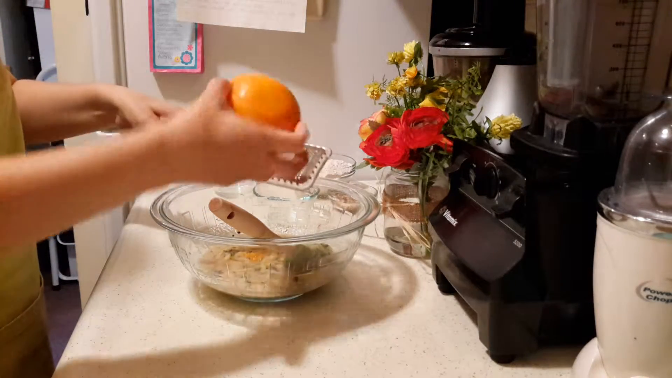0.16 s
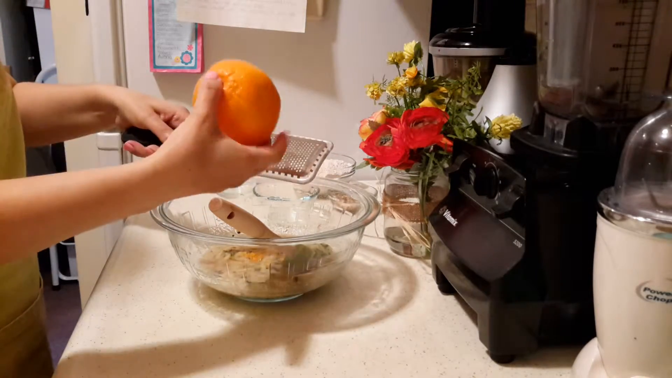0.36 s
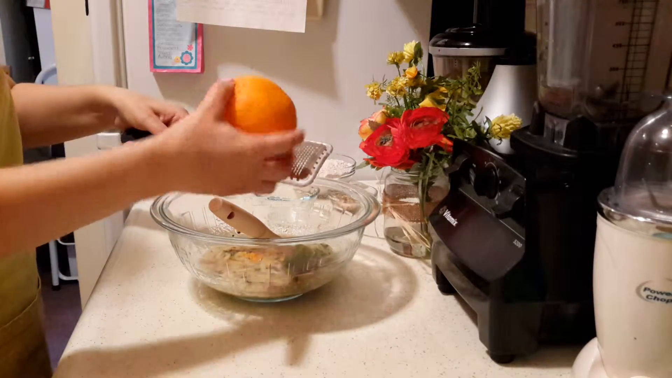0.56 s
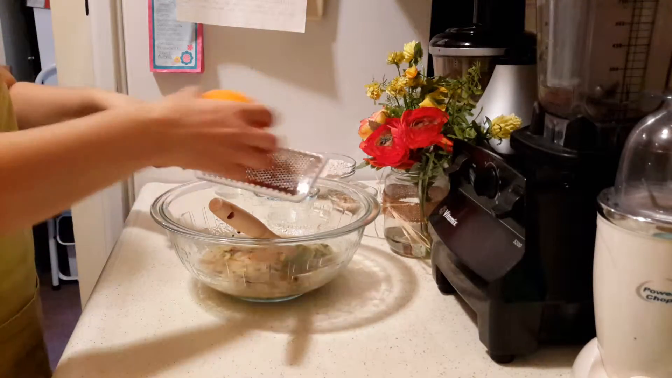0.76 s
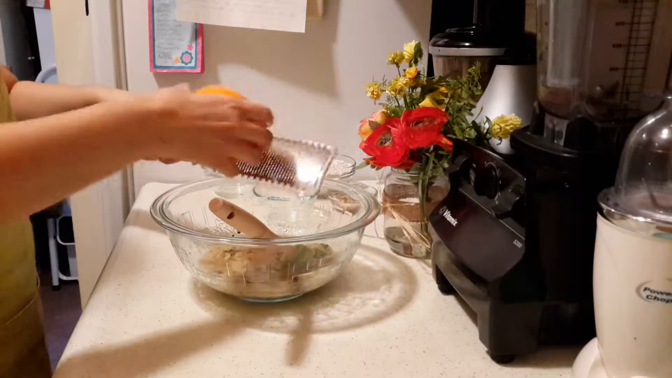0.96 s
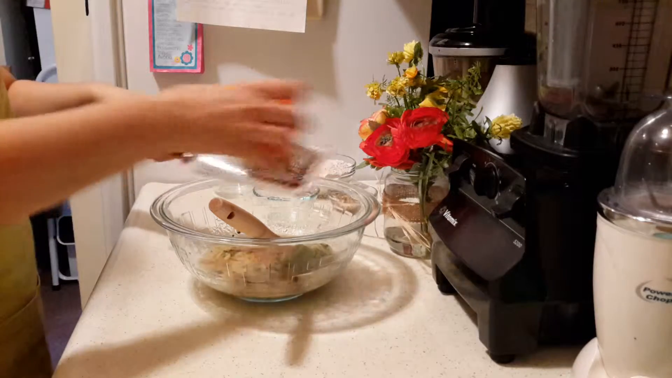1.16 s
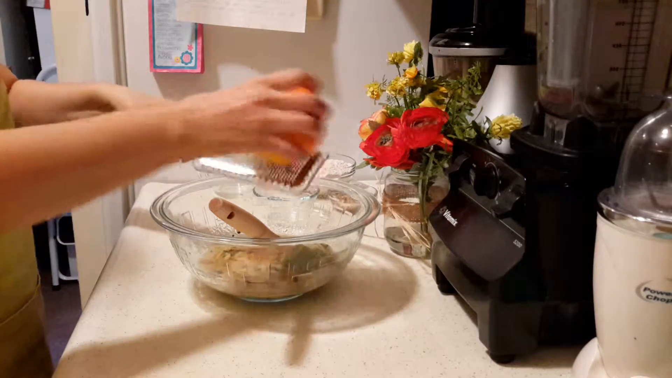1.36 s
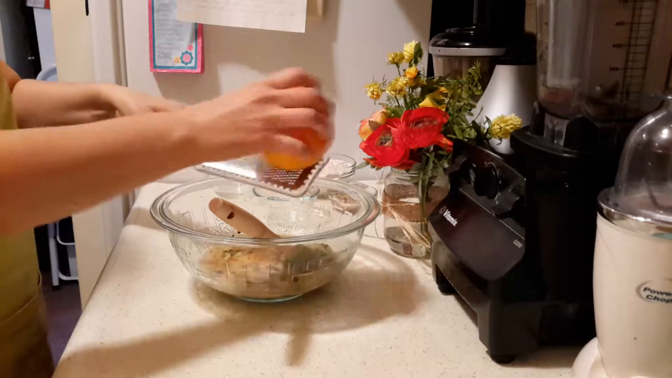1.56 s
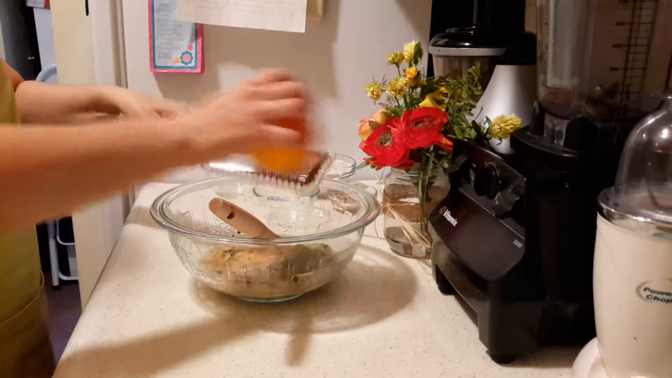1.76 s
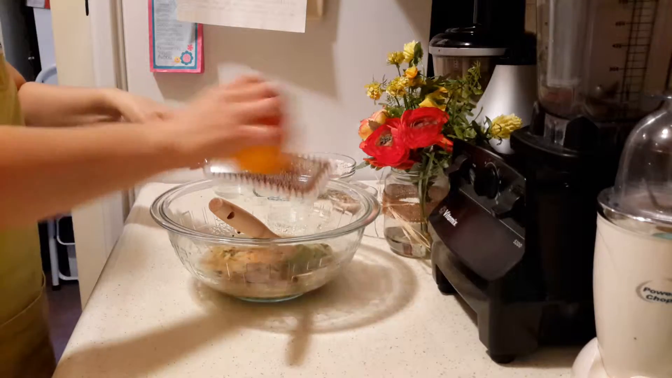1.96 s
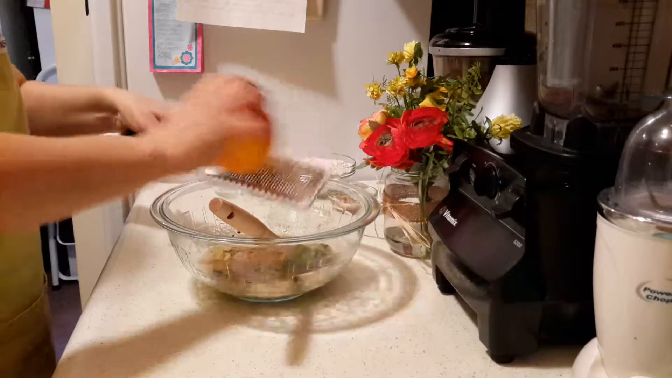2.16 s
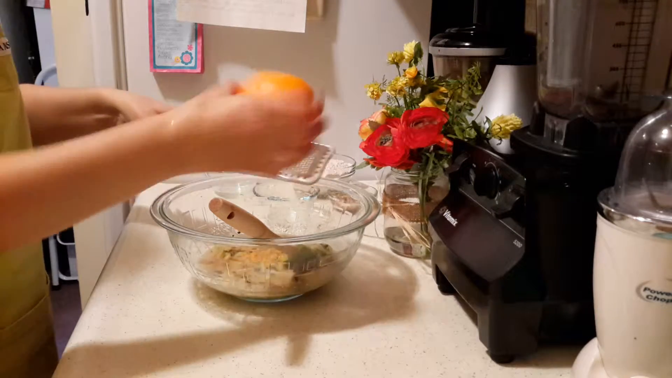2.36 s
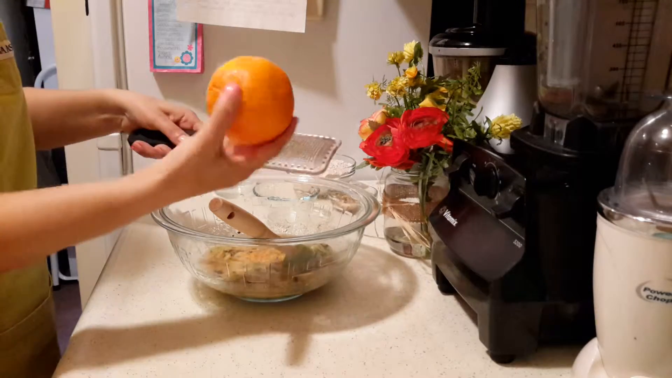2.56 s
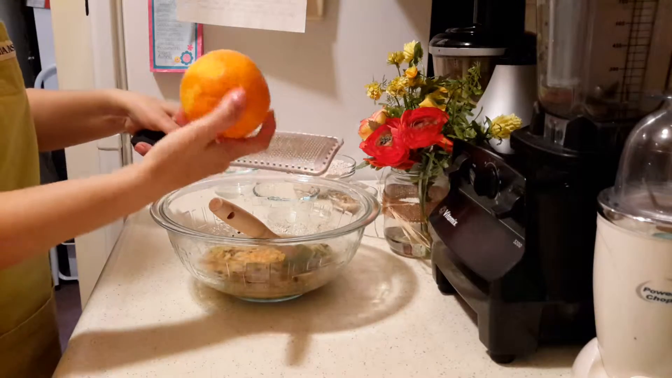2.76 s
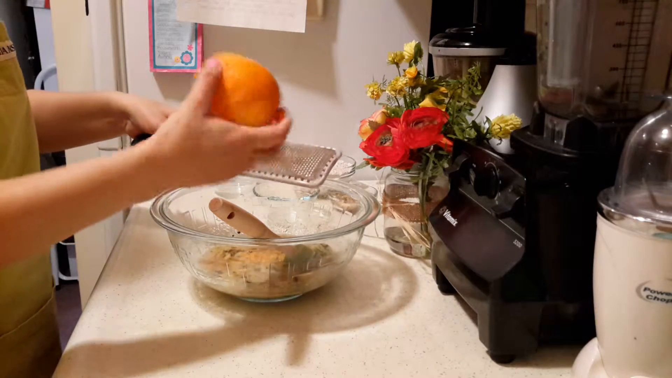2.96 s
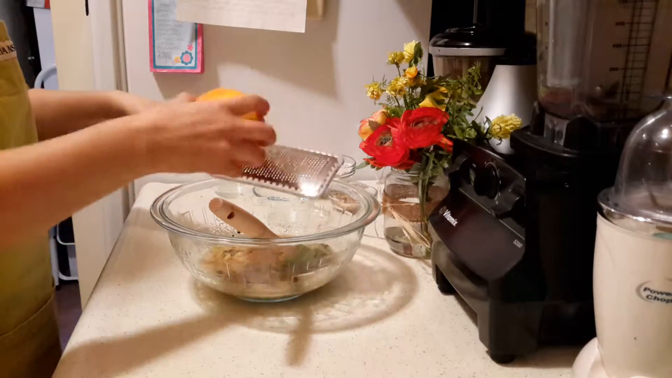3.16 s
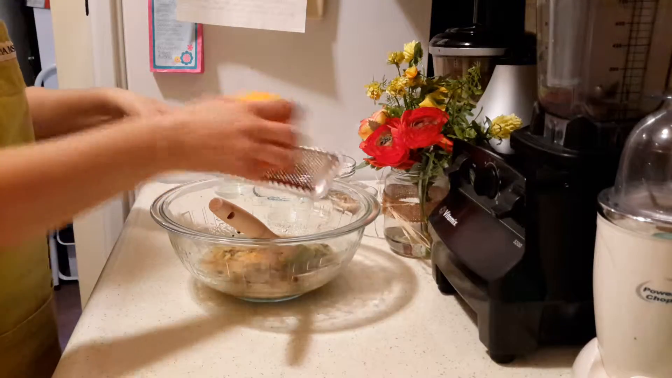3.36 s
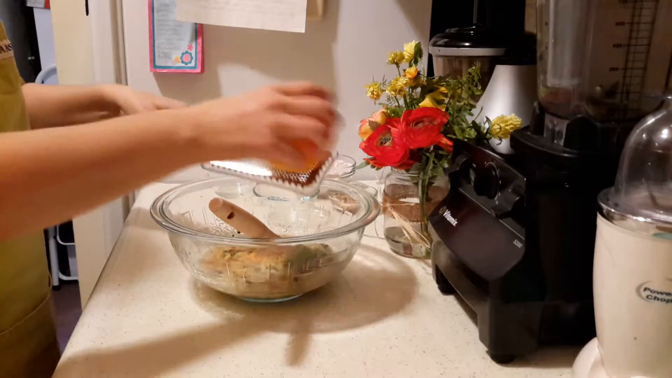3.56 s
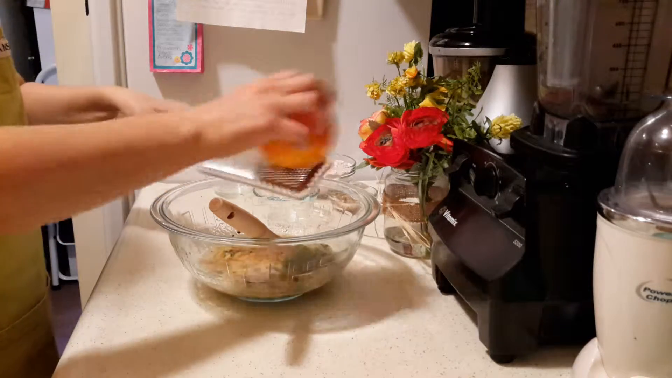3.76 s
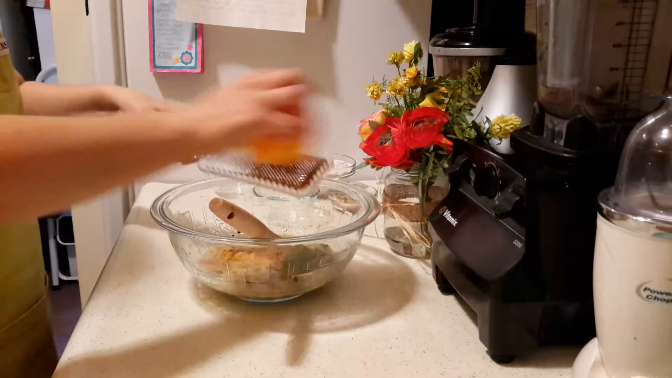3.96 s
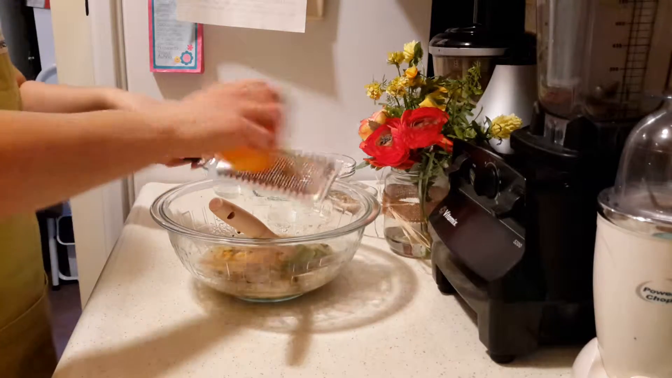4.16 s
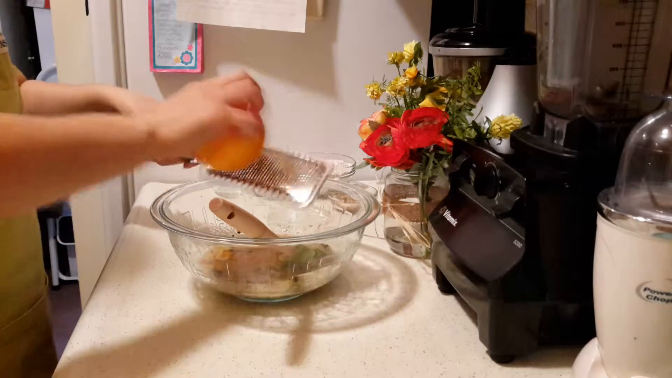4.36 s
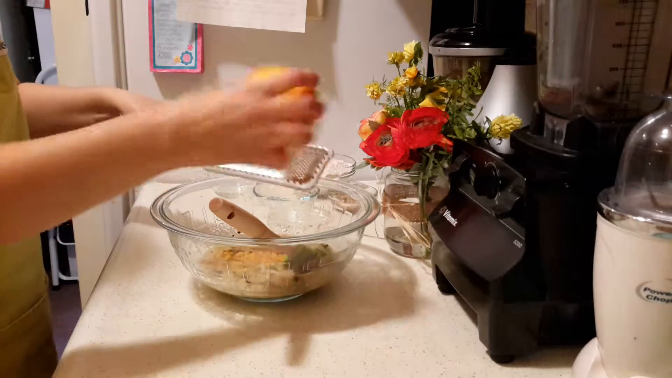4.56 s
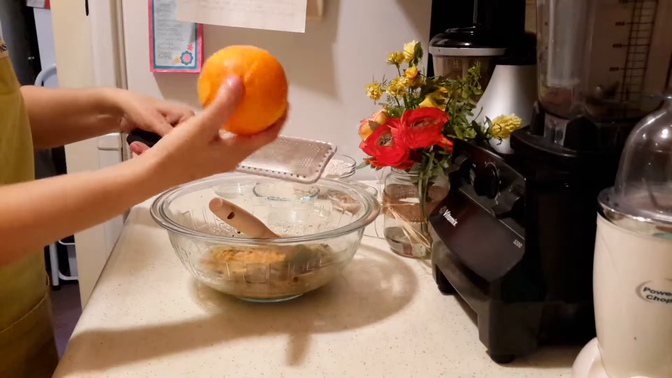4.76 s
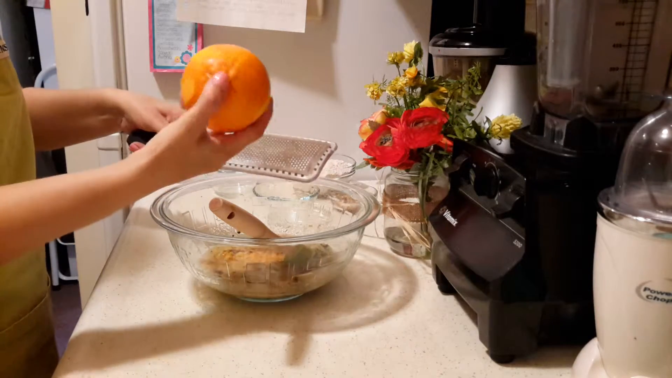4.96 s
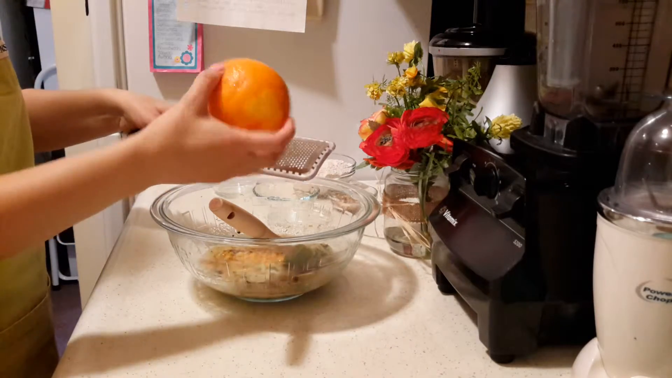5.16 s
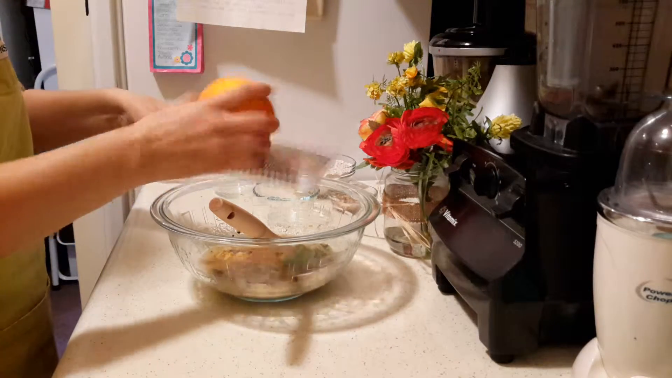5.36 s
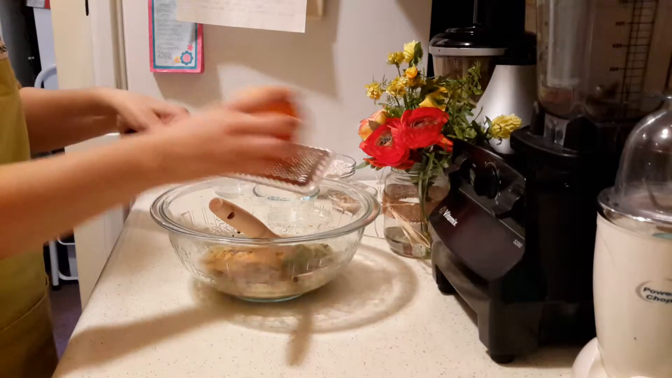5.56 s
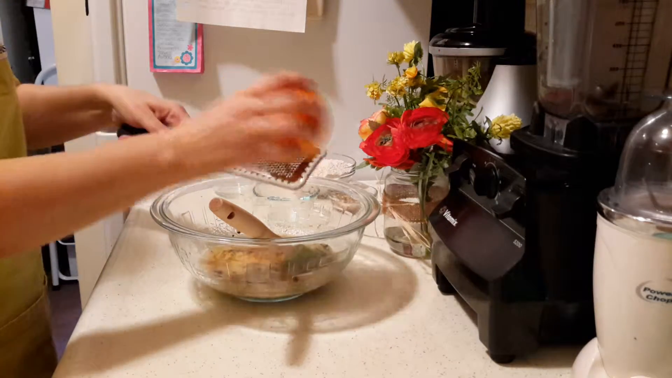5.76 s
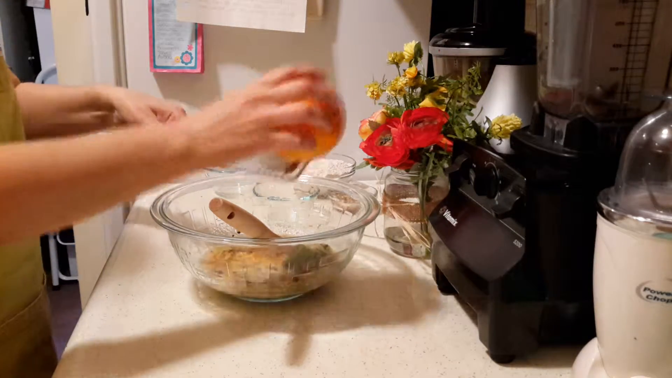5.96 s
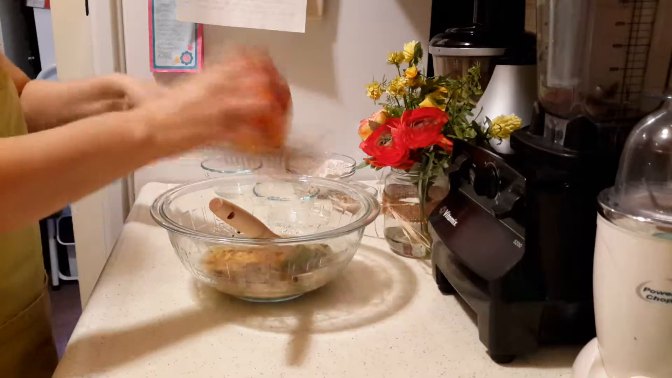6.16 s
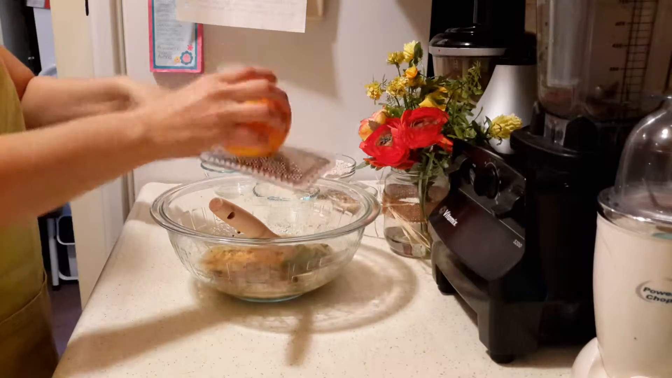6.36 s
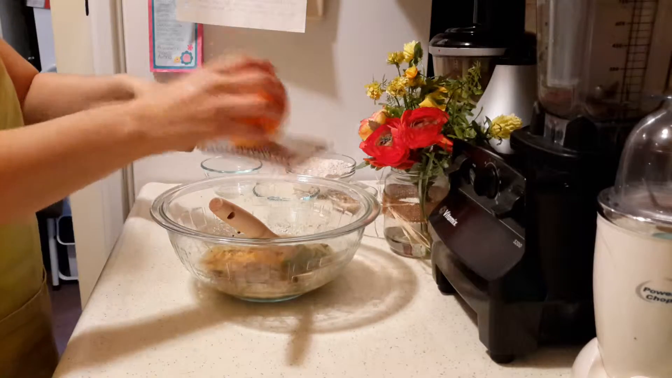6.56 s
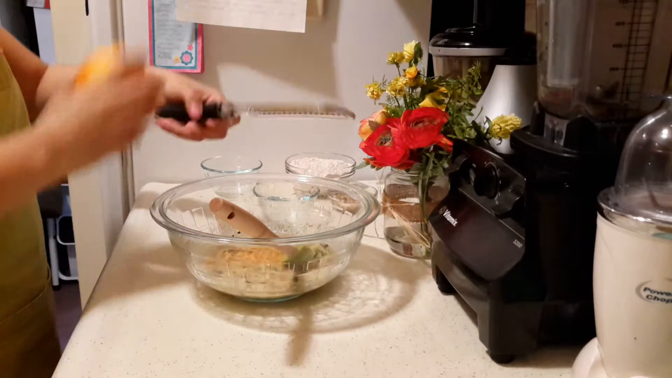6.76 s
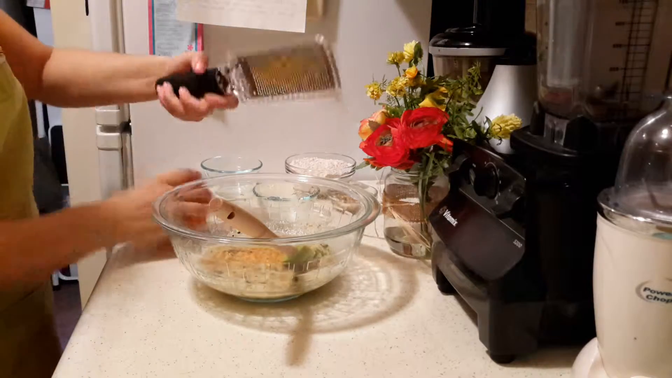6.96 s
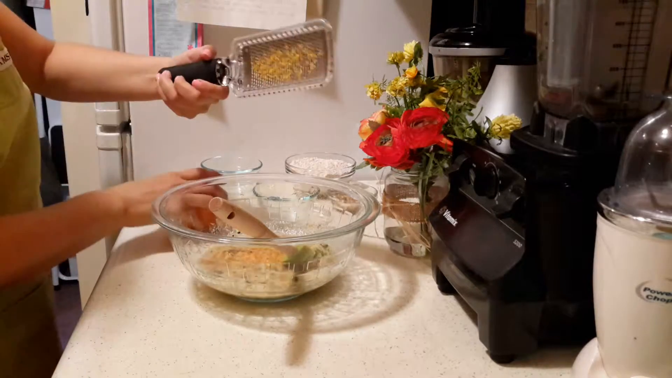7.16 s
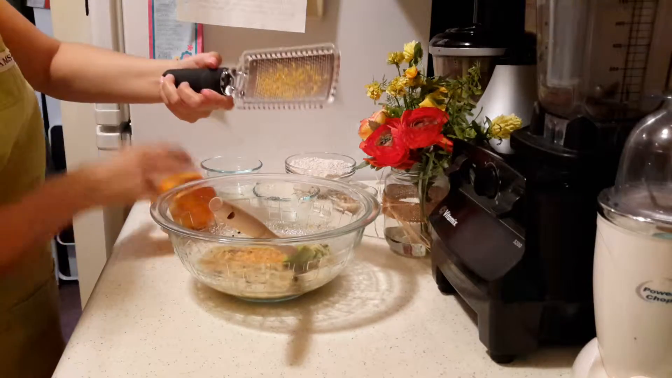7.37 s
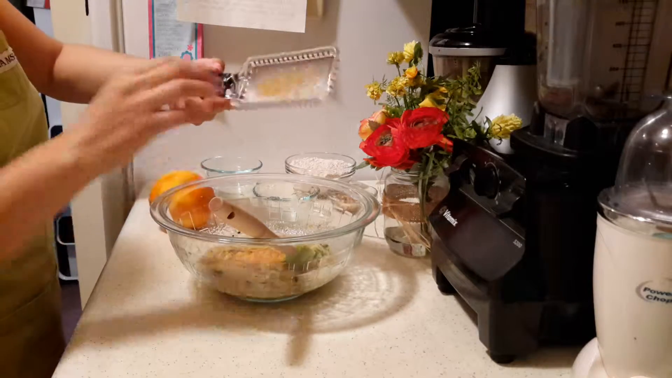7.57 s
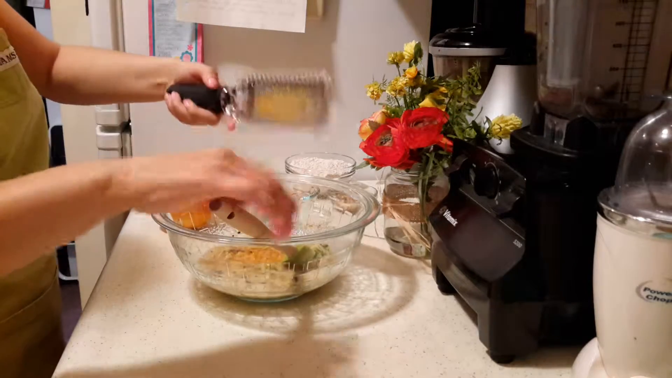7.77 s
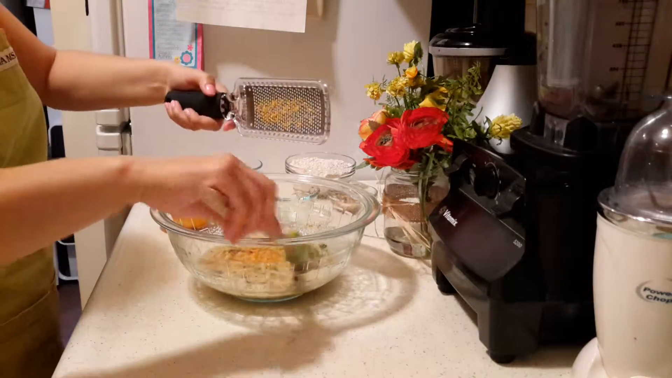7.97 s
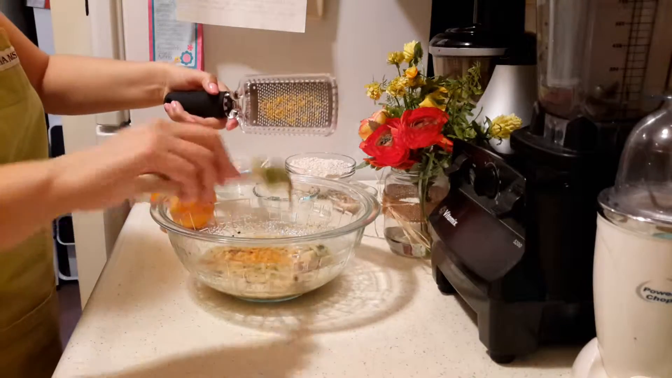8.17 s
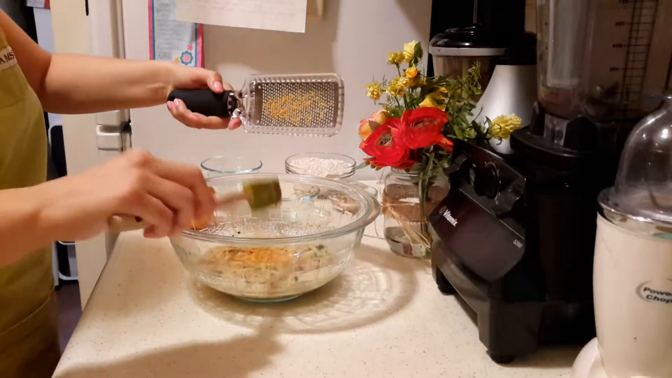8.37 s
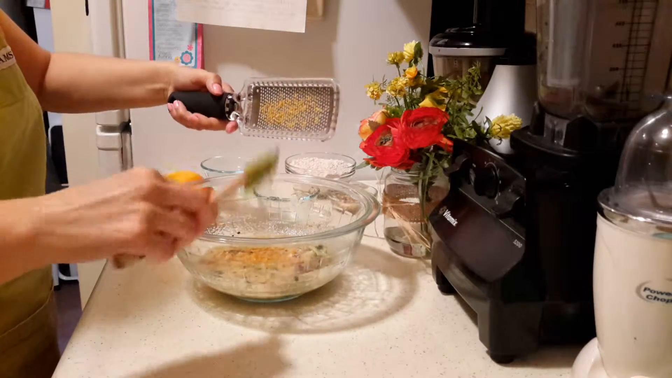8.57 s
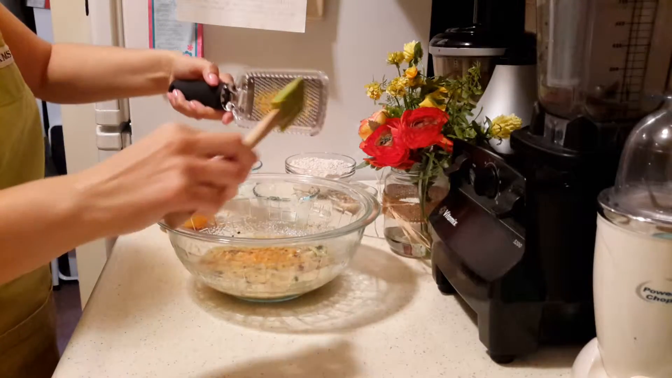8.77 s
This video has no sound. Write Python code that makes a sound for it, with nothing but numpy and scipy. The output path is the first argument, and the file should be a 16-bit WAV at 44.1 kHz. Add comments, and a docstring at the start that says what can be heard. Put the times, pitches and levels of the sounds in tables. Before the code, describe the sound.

Orange peel is rasped back and forth on a metal grater in quick bursts, then tapped; a glass bowl clanks over a low appliance hum.

```python
"""A small kitchen with a small, hissing microphone: an appliance hums throughout, built of coloured noise and tones.
An orange is rasped to and fro on a steel hand grater in several series: showers of snaps, coloured by teeth and plate.
It is then tapped on the grater to shake the zest off (chatter and ringing modes) and set down (low pushes).
Last, a glass bowl is knocked and rocks on the counter: beating pairs of tones, thuds and cracks.
The recorder's noise suppressor lets hum and hiss swell while loud sound, such as the rasping, lasts."""
import sys
import numpy as np
from scipy import signal
from scipy.fft import rfft, irfft
from scipy.io import wavfile
from scipy.ndimage import uniform_filter1d, minimum_filter1d, map_coordinates

SR = 44100
rng = np.random.default_rng(int(sys.argv[2]) if len(sys.argv) > 2 else 0)


def voltage_ratio(level):
    """Linear amplitude factor for a level in decibels (scalar or array-like)."""
    return 10 ** (np.asarray(level, float) / 20)


def transcribe(signal):
    """Save signal, clipped to [-1, 1], as a 16-bit WAV file at the path in sys.argv[1]."""
    frames = np.atleast_2d(signal).T
    limited = np.clip(frames, -1, 1)
    pcm = np.round(limited * 32767).astype(np.int16)
    wavfile.write(sys.argv[1], SR, pcm)


N = 389403
T = np.arange(N) / SR


def unit(x):
    """Scaled to rms 1."""
    return x / np.sqrt(np.mean(x ** 2) + 1e-20)


def along(points, hz):
    """(Hz, value) points read on a log frequency axis."""
    f, v = np.transpose(points)
    return np.interp(np.log(hz + 1), np.log(f + 1), v)


def wobble(rate):
    """A smooth random curve with rate knots a second."""
    knots = rng.standard_normal(int(N * rate / SR) + 4)
    return map_coordinates(knots, [T * rate])


def coloured(x, spectrum, rings=()):
    """x through a minimum-phase filter of energy 1, shaped by a spectrum and broad resonances."""
    hz = np.fft.rfftfreq(8192, 1 / SR)
    db = along(spectrum, hz)
    for centre, width, gain_db in rings:
        db = db + gain_db / (1 + (2 * (hz - centre) / width) ** 2)
    # Folding the cepstrum onto positive times makes the filter causal.
    cepstrum = irfft(np.log(voltage_ratio(db) + 1e-6))
    cepstrum[1:4096] *= 2
    cepstrum[4097:] = 0
    pulse = irfft(np.exp(rfft(cepstrum)))
    return signal.fftconvolve(x, pulse / np.linalg.norm(pulse))[:len(x)]


def placed(s, x):
    """x on the time line, starting at s seconds."""
    out = np.zeros(N + len(x))
    out[round(s * SR):][:len(x)] = x
    return out[:N]


def tones(table, rate):
    """Steady lines that waver in level and slightly in phase."""
    out = np.zeros(N)
    for hz, db, waver_db in table:
        level = voltage_ratio(db + waver_db * wobble(rate))
        out += level * np.sin(2 * np.pi * hz * T + 0.55 * wobble(rate))
    return out


# How long the kitchen rings. Each row: frequency in Hz, t60 in s.
ROOM_DECAY = [(100, 0.38), (600, 0.42), (2000, 0.23), (8000, 0.19), (15000, 0.13)]


def room(x):
    """The walls answer with a noise tail in which each frequency dies at its own speed."""
    hz, t, z = signal.stft(rng.standard_normal(SR // 2), SR, nperseg=256)
    decay = voltage_ratio(-60 * t / along(ROOM_DECAY, hz)[:, None])
    tail = signal.istft(z * decay, SR, nperseg=256)[1]
    late = np.pad(x, (90, 0))  # 2 ms, a path 0.7 m longer than the direct one
    return signal.oaconvolve(late, tail / np.linalg.norm(tail))[:len(x)]


def blow(s, db, t60, room_db):
    """A contact that chatters briefly as decaying noise, and the walls' answer to a click with it."""
    t = T[:SR // 2]
    chatter = voltage_ratio(-60 * t / t60) * rng.standard_normal(len(t))
    click = 1. * (t == 0)
    return placed(s, voltage_ratio(db) * (chatter + voltage_ratio(room_db) * room(click)))


def push(s, db, hz, t60):
    """One contact that sets off a single decaying mode, with a soft onset."""
    t = T[:SR // 4]
    onset = 1 - np.exp(-t * hz)
    return placed(s, -voltage_ratio(db - 60 * t / t60) * onset * np.sin(2 * np.pi * hz * t))


# Colour of the microphone's hiss. Each row: frequency in Hz, relative level in dB.
HISS_COLOUR = [(900, -16), (1700, -14), (2400, -11), (4580, -13), (4890, -10.5), (5870, -11), (6210, -6),
               (7040, -6), (7820, 1), (10500, -12.5), (15700, -19.5)]
# Thin whines in it. Each row: frequency in Hz, level against the hiss in dB, waver in dB.
WHINES = [(5071, -19.5, 2.5), (6406, -12.5, 3.5), (7500, -21, 9), (12850, -30, 8)]


def microphone_hiss():
    """The small microphone's own noise, nearly steady, with thin wavering whines in it."""
    noise = voltage_ratio(0.35 * wobble(4.8)) * coloured(rng.standard_normal(N), HISS_COLOUR)
    return voltage_ratio(-59) * (noise + tones(WHINES, 25))


# Colour of the appliance's drone. Each row: frequency in Hz, relative level in dB.
DRONE_COLOUR = [(25, -34), (55, -33), (75, -35), (95, -24), (118, -21), (140, -18), (165, -5), (195, -13.5),
                (250, -17.5), (300, -14.5), (400, -13), (450, -18.5), (650, -19), (750, -24), (1250, -29.5),
                (1550, -30.5), (1750, -39.5), (2600, -71)]
# Its motor tones. Each row: frequency in Hz, level against the hum in dB, waver in dB.
MOTOR_TONES = [(55, -12, 1), (218.3, 0.5, 2), (406, -12, 0)]


def appliance():
    """The appliance's hum: low coloured noise and motor tones."""
    drone = voltage_ratio(-2.5 + 0.27 * wobble(2.37)) * coloured(rng.standard_normal(N), DRONE_COLOUR)
    return voltage_ratio(-49) * (drone + tones(MOTOR_TONES, 9))


# The orange lands on the teeth before a series of strokes. Each row: start in s, level in dB.
LANDINGS_AT = [(.832, -39), (3.28, -40.5), (5.5307, -42)]
# Small wet ticks of fingers on the peel. Each row: start in s, level in dB.
FINGER_TICKS = [(0.292, -48), (4.79, -46), (4.882, -47), (5.091, -47), (6.807, -48), (7.05, -69),
                (8.067, -48)]
# Faint scuffs of the hands. Each row: start in s, level in dB, pitch in Hz, spread in octaves,
# life (fall of 20 dB) in s.
HAND_SCUFFS = [(4.849, -52, 13100, .3, .02), (6.86, -58, 4470, 1.3, .13), (7.168, -50, 1300, .5, .02),
               (7.49, -56.5, 4500, 1.5, 0.14), (7.545, -52, 7350, .1, .05)]


def ticks():
    """Landings, ticks and scuffs: short puffs of noise in a band around each pitch."""
    rows = [(s, db, 6300, 0.85, 0.0084) for s, db in LANDINGS_AT]
    rows += [(s, db, 8800, 0.19, 0.0066) for s, db in FINGER_TICKS]
    rows += HAND_SCUFFS
    out = np.zeros(N)
    t = T[:SR // 4]
    for s, db, hz, octaves, life in rows:
        envelope = voltage_ratio(db - 20 * t / life) * (1 - np.exp(-8 * t / life))
        puff = envelope * rng.standard_normal(len(t))
        low, high = hz / 2 ** octaves, hz * 2 ** octaves
        band = [(low * 0.58, -30), (low, -5), (hz, 0), (high, -5), (high * 1.4, -30)]
        out += placed(s, coloured(puff, band))
    return out + voltage_ratio(-2.5) * room(out)


# The orange is set down on the counter and settles.
# Each row: start in s, level in dB, pitch at the onset in Hz.
SET_DOWN = [(7.172, -49, 95), (7.199, -40, 158)]


def thumps():
    """A soft, heavy contact: a low decaying push whose pitch falls for 60 ms, then steadies partway back."""
    t = T[:SR // 4]
    out = np.zeros(N)
    for s, db, hz in SET_DOWN:
        bend = 1 - 4.4 * np.minimum(t, 0.06)
        out += placed(s, voltage_ratio(db - 60 * t / 0.16) * np.sin(2 * np.pi * hz * t * bend))
    return out


# Modes of the bowl, in Hz; each has a close twin that beats against it.
BOWL_HZ = [577, 1114, 1470, 2721, 4248, 5941, 6998, 7777, 8301, 8958, 9695, 10765, 12140, 13870]
# For each mode. Each row: level in dB, t60 in s, twin above the mode in Hz, signed share of the twin.
BOWL_MODES = [(-42, .3, 2, -0.23), (-34, 0.17, 5.4, .3), (-24, 0.63, 7.7, -1.45), (-19.5, 0.39, 28.5, 0.34),
              (-14.5, 0.2, 6.2, -0.34), (-18, 0.18, 11, 0.071), (-39, .15, 15, .3), (-17, 0.11, 14, 0.18),
              (-23, 0.12, 12, 0.031), (-35, 0.21, 14, -0.26), (-32, 0.1, 20, .3), (-33, 0.099, 20, .3),
              (-46, .08, 20, .3), (-54, .09, 20, .3)]
# The blow, then the foot rocking on the counter. Each row: start in s, thud in dB, crack in dB.
BOWL_KNOCKS = [(8.6269, -15.5, -9), (8.6323, -5, -16), (8.654, -10, -33), (8.689, -26, -35)]
# Colours of thud and crack. Each row: frequency in Hz, relative level in dB per Hz.
THUD_COLOUR = [(50, -27), (90, -12), (130, -8), (165, -10), (220, -4), (340, -11), (600, -6.5), (1200, -12),
               (2500, -22), (6000, -56), (12000, -100)]
CRACK_COLOUR = [(600, -50), (2000, 4.5), (3500, 0.5), (5000, -5), (8000, 4), (10500, -13), (12000, -27),
                (15000, -50)]
# Rings of the counter under the bowl. Each row: centre in Hz, width in Hz, gain in dB.
COUNTER_RINGS = [(128, 15, 4), (288, 20, 7), (334, 25, 5), (385, 25, 6), (616, 37, 3.5), (937, 29, 4)]


def bowl():
    """The struck glass rings in beating pairs; its foot thuds and cracks on the counter."""
    t = T[:SR // 2]
    ring = np.zeros(len(t))
    for hz, (db, t60, split, twin) in zip(BOWL_HZ, BOWL_MODES):
        pair = np.sin(2 * np.pi * hz * t) + twin * np.sin(2 * np.pi * (hz + split) * t)
        ring += voltage_ratio(db - 60 * t / t60) * pair
    glass = placed(BOWL_KNOCKS[0][0], ring * (1 - np.exp(-t / 0.0007)))
    foot = sum(push(s, db + 0.3, hz=346, t60=0.026) for s, db, _ in BOWL_KNOCKS)
    thud = sum(blow(s, db - 8.5, t60=0.041, room_db=18) for s, db, _ in BOWL_KNOCKS)
    crack = sum(blow(s, db, t60=0.011, room_db=15) for s, _, db in BOWL_KNOCKS)
    return glass + foot + coloured(thud, THUD_COLOUR, COUNTER_RINGS) + coloured(crack, CRACK_COLOUR)


# The orange taps the grater. Each row: start in s, level in dB, low knock and plate ring
# against that level in dB, t60 of the rattle in s.
ORANGE_TAPS = [(6.2365, -49.5, -22, -1, 0.032), (6.331, -16, -26, -26.5, 0.087),
               (6.5052, -22, -18.5, -17, 0.024), (6.6713, -27, -17, -18, 0.03)]
# Colour of the rattling teeth. Each row: frequency in Hz, relative level in dB.
RATTLE_COLOUR = [(700, -41), (1200, -26), (2000, -14), (3000, -11.5), (5400, -10.5), (7500, -1.5),
                 (10500, -12.5), (15700, -34)]
# Narrow modes of the struck grater. Each row: frequency in Hz, relative level in dB, t60 in s.
STEEL_MODES = [(942, -5, .12), (1900, -12, .15), (2400, -6, .11), (2611, -5, .14), (3287, -3, .2),
               (3941, -7, .11), (4355, -7, .15), (4900, -5, .12), (5733, -4, .12)]


def taps():
    """Each tap rattles the teeth, rings the plate and gives a duller knock of the fruit."""
    fruit = [(80, -14), (130, 7), (300, -31), (600, -2), (1000, -1.5), (2000, -21), (8000, -60)]  # Hz, dB
    rattle, ring, knock, firm, modes = np.zeros((5, N))
    for s, db, low_db, plate_db, t60 in ORANGE_TAPS:
        rattle += blow(s, db - 8.5, t60, room_db=22)
        ring += blow(s, db + plate_db, t60=0.06, room_db=23)
        knock += blow(s, db + low_db + 3, t60=0.04, room_db=16.5)
        firm += push(s + 0.00089, db + low_db + 8.5, hz=765, t60=0.029)
        for hz, mode_db, mode_t60 in STEEL_MODES:
            # Each tap excites the modes a little differently.
            modes += push(s, db - 25 + mode_db + rng.normal(0, 3.4), hz, mode_t60)
    struck = coloured(rattle, RATTLE_COLOUR) + coloured(ring, PLATE_COLOUR, PLATE_RINGS)
    return firm + modes + struck + coloured(knock, fruit)


def grains(per_s, scatter_db):
    """Random snaps of unequal size, per_s a second, scaled to rms 1."""
    hit = rng.random(N) < per_s / SR
    size = voltage_ratio(scatter_db * rng.exponential(size=N))
    return unit(hit * rng.standard_normal(N) * size)


# Strokes of the peel, mostly firm pushes and light returns in turn. Each row: top speed at in s,
# level in dB, rise in s, fall in s, plate under the teeth in dB.
PEEL_STROKES = [(0.026, -29.5, 0.023, .039, -7), (0.983, -30, 0.038, .031, -11.5),
                (1.088, -36.5, .021, .038, -15.5), (1.228, -32, 0.035, 0.034, -10),
                (1.362, -39, .043, .023, -13.5), (1.472, -29, 0.029, 0.034, -8.5),
                (1.595, -36.5, 0.028, .026, -14), (1.701, -28, 0.027, 0.035, -8),
                (1.834, -38, 0.035, .017, -12.5), (1.929, -28.5, .024, 0.033, -8.5),
                (2.054, -39.5, .039, 0.026, -9.5), (2.167, -29, .033, 0.027, -7),
                (2.27, -39, 0.028, 0.027, -12), (2.38, -27.5, 0.023, .032, -8.5),
                (3.444, -32.5, 0.05, .029, -13), (3.552, -38.5, .027, 0.029, -22),
                (3.676, -28, 0.034, .03, -11.5), (3.792, -39.5, 0.031, 0.032, -12.5),
                (3.907, -29, 0.026, 0.039, -10.5), (4.034, -38.5, .028, 0.026, -11.5),
                (4.149, -27.5, 0.034, 0.027, -11), (4.254, -37.5, .026, 0.028, -12),
                (4.372, -30, .024, .028, -11), (4.494, -39.5, .031, 0.018, -12.5),
                (4.59, -28.5, .025, 0.034, -10), (5.639, -30.5, .031, 0.034, -11.5),
                (5.757, -38, 0.027, 0.025, -15), (5.884, -29.5, .037, .022, -8.5),
                (5.976, -35, .021, 0.035, -12), (6.092, -30, .028, 0.039, -9.5)]
# Colours of the teeth tearing the peel, and of the plate that they shake.
# Each row: frequency in Hz, relative level in dB per Hz.
TEETH_COLOUR = [(880, -40), (1500, -22), (2290, -17), (2480, -27.5), (3260, -13.5), (4210, -10.5),
                (5280, -10.5), (7970, 0.5), (10400, -11), (13700, -17.5), (15300, -19), (15900, -50)]
PLATE_COLOUR = [(100, -93), (300, -11), (900, -8.5), (1250, -7), (1600, -10.5), (2100, -10), (2800, 2.5),
                (3500, -3), (4300, -2), (5500, -6.5), (9000, -39)]
# Broad rings of the perforated plate. Each row: centre in Hz, width in Hz, gain in dB.
PLATE_RINGS = [(1250, 82, 2.5), (2040, 320, 8), (2500, 730, 1), (3200, 120, -7), (4360, 220, 3)]


def grater():
    """Faster peel tears louder; each stroke hits another spot, which favours other rings."""
    catch = voltage_ratio(0.66 * wobble(130))  # rows of teeth grip unevenly
    tearing = catch * grains(11000, scatter_db=-0.6)
    shaking = catch * grains(5000, scatter_db=0.73)
    # The orange slides a little after each landing.
    drags = [(s + 0.0031, db - 8, 0.0031, 0.035, -11) for s, db in LANDINGS_AT]
    out = np.zeros(N)
    for s, db, rise, fall, plate_db in PEEL_STROKES + drags:
        near = slice(max(round((s - 0.2) * SR), 0), round((s + 0.35) * SR))
        late = np.abs(T[near] - s) / np.where(T[near] < s, rise, fall)
        force = voltage_ratio(db - 6.22 * late ** 2.24)  # higher power = flatter top, steeper ends
        rings = [(hz, width, gain_db + 4.5 * rng.standard_normal()) for hz, width, gain_db in PLATE_RINGS]
        teeth = coloured(force * tearing[near], TEETH_COLOUR)
        plate = coloured(voltage_ratio(plate_db) * force * shaking[near], PLATE_COLOUR, rings)
        rasp = teeth + plate
        out[near] += rasp + voltage_ratio(-7) * room(rasp)
    return out


def scene():
    """All sources in the kitchen, on one channel."""
    background = microphone_hiss() + appliance()
    return (background + ticks() + thumps() + bowl() + taps() + grater())[None]


def lagged(x, lag_s, start):
    """x followed sluggishly by a one-pole smoother that begins near start."""
    keep = np.exp(-1 / (lag_s * SR))
    return signal.lfilter([1 - keep], [1, -keep], x, zi=[[start]])[0]


def suppressor(x):
    """The gain rises quickly while loud sound passes and sinks back slowly in the quiet."""
    THRESHOLD_DB, HOLD_S, OPENS_S, CLOSES_S = -42.5, 0.03, 0.065, 0.37
    OPEN_DB, START_DB = 5 / 1.5, 3.75  # gain aimed at in loud sound, and gain at the start
    level_db = 10 * np.log10(np.abs(uniform_filter1d(x ** 2, size=441)) + 1e-12)  # over 10 ms
    hold = round(HOLD_S * SR) // 2
    held_db = -minimum_filter1d(-level_db, 2 * hold + 1, origin=hold)  # loudest of the last HOLD_S
    target_db = np.where(held_db > THRESHOLD_DB, OPEN_DB, 0.0)
    # The higher of a fast and a slow follower opens fast and closes slowly.
    gain_db = np.maximum(lagged(target_db, OPENS_S, START_DB), lagged(target_db, CLOSES_S, START_DB))
    return x * voltage_ratio(gain_db)


def roll_off(x):
    """The treble ends steeply here."""
    return signal.sosfilt(signal.butter(12, 16660, fs=SR, output="sos"), x)


def record(dry):
    """The microphone drops the deepest bass, below 39.6 Hz; then the noise suppressor works on it."""
    microphone = signal.butter(2, 39.6, "high", fs=SR, output="sos")
    heard = signal.sosfilt(microphone, dry)
    return roll_off(suppressor(heard))


dry = scene()
out = record(dry)
transcribe(out)
```